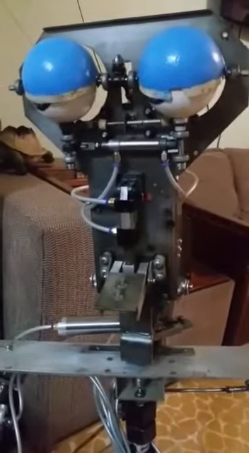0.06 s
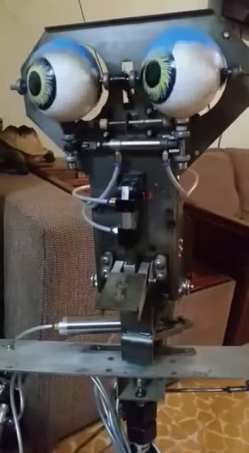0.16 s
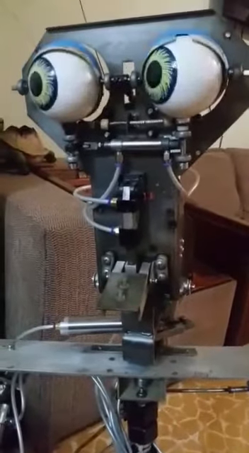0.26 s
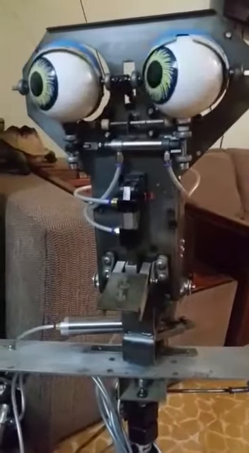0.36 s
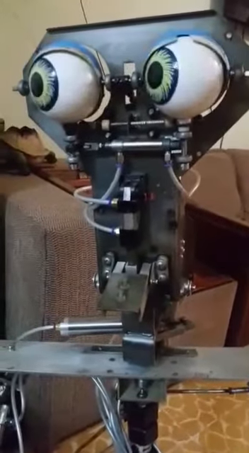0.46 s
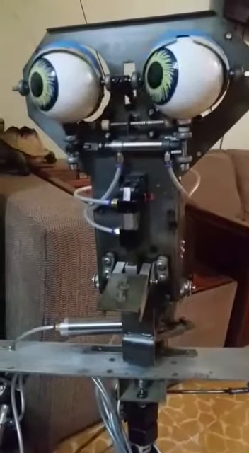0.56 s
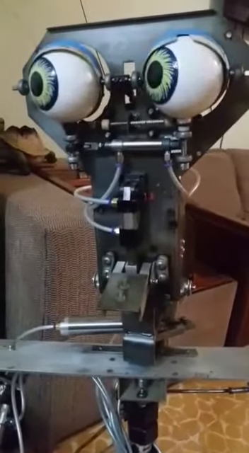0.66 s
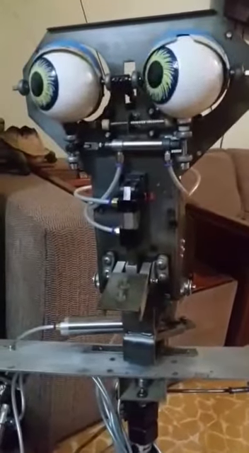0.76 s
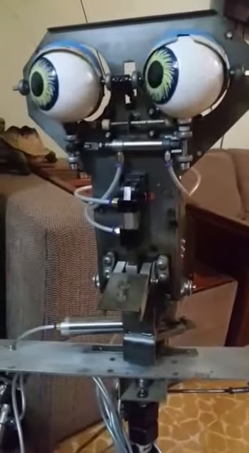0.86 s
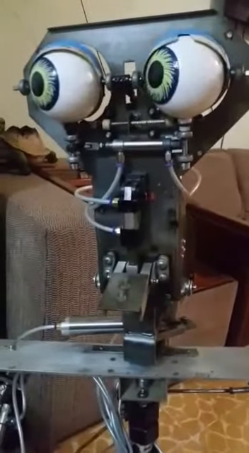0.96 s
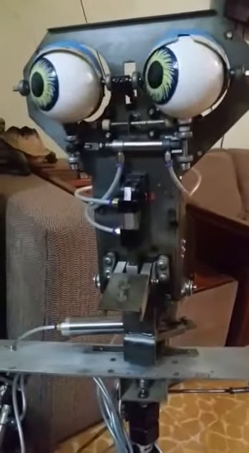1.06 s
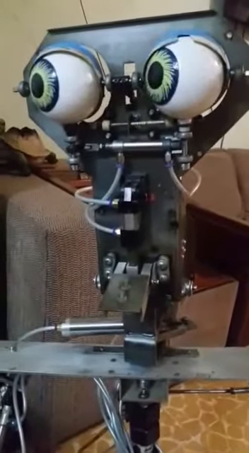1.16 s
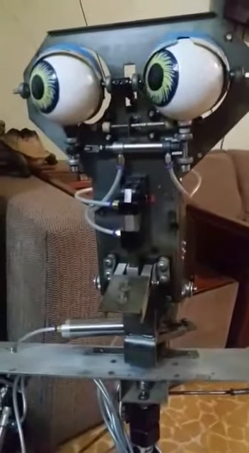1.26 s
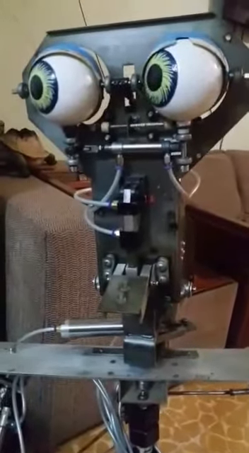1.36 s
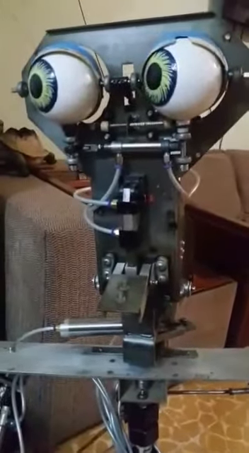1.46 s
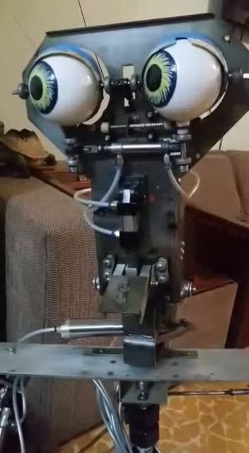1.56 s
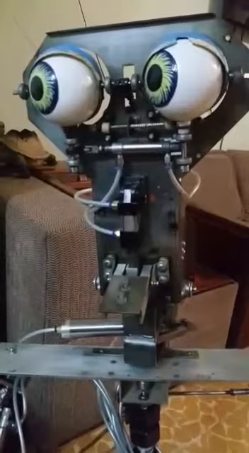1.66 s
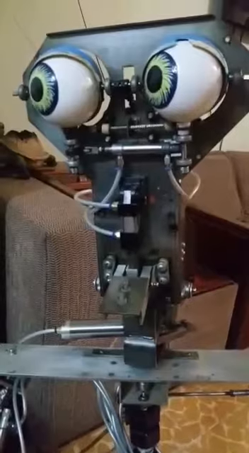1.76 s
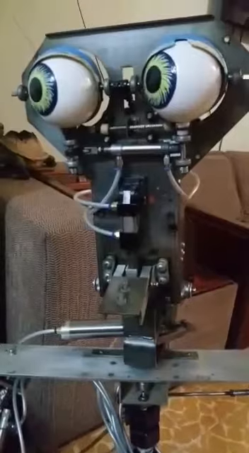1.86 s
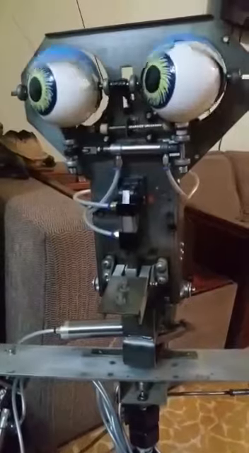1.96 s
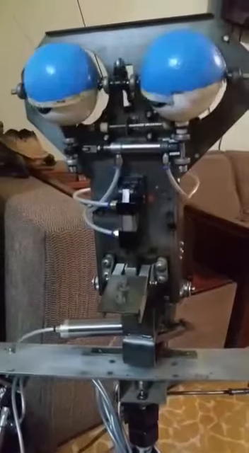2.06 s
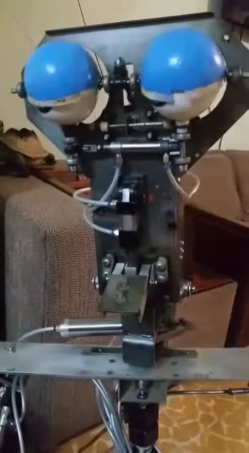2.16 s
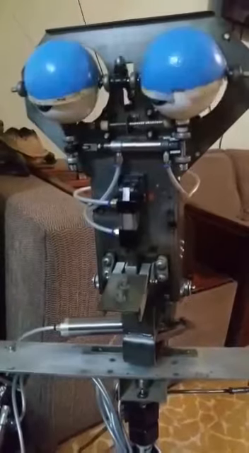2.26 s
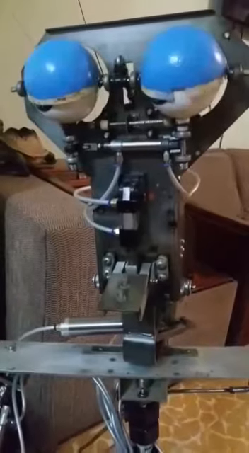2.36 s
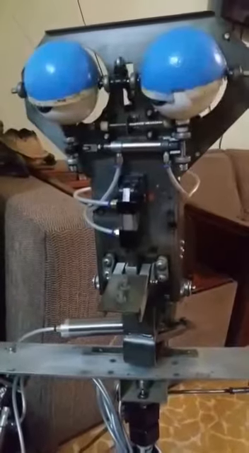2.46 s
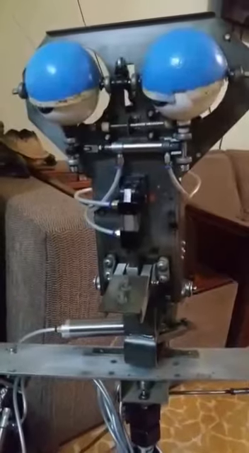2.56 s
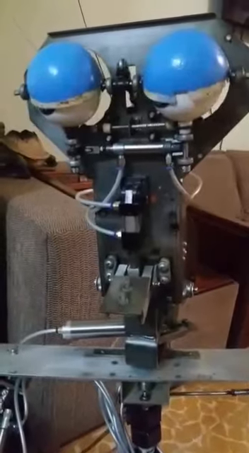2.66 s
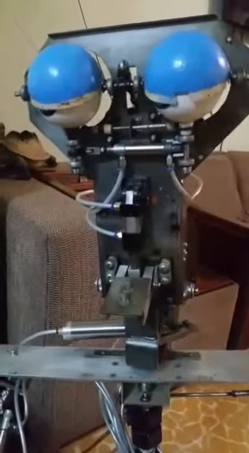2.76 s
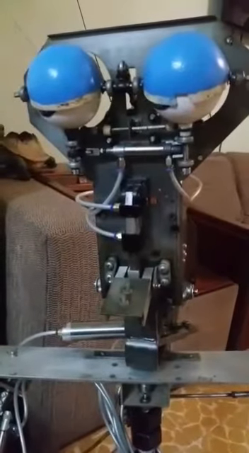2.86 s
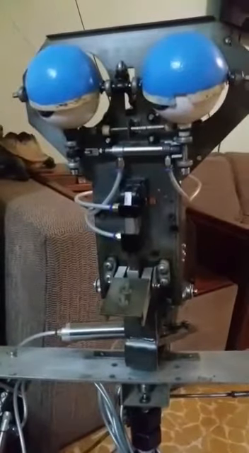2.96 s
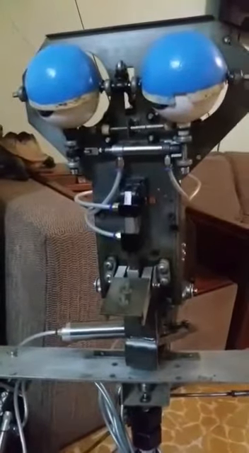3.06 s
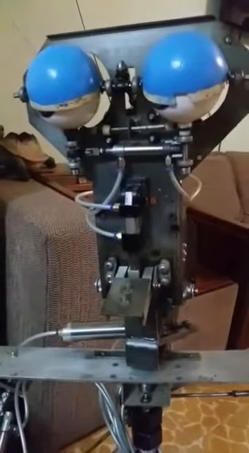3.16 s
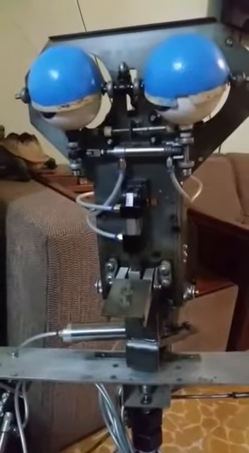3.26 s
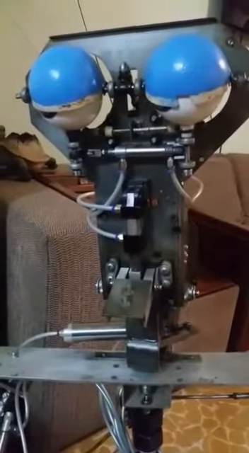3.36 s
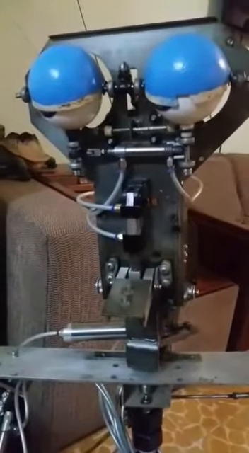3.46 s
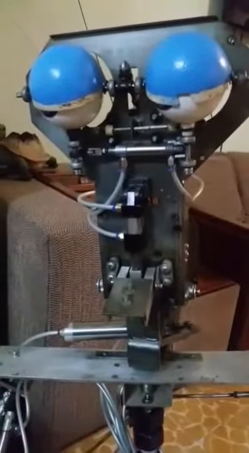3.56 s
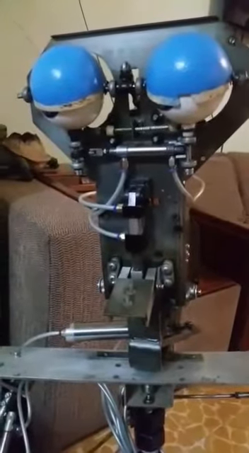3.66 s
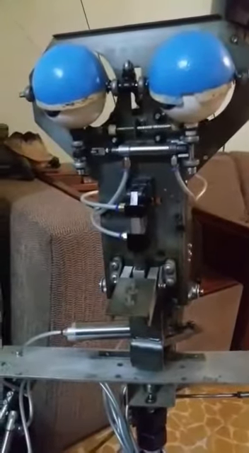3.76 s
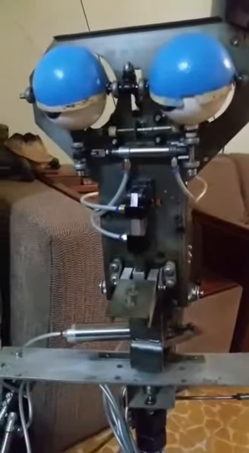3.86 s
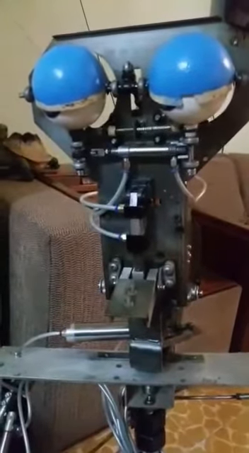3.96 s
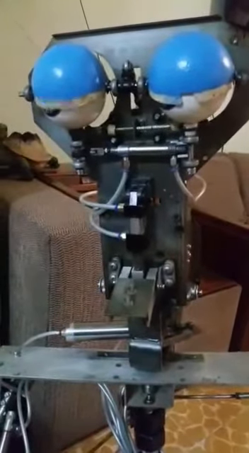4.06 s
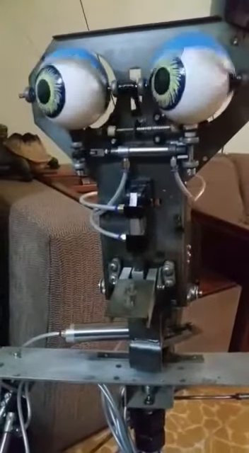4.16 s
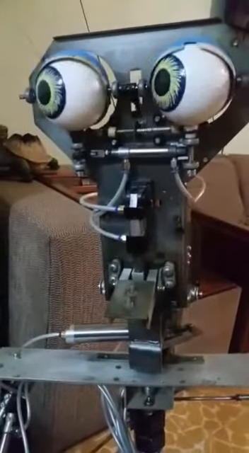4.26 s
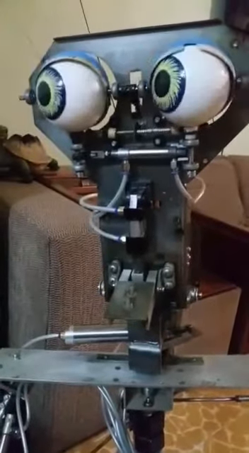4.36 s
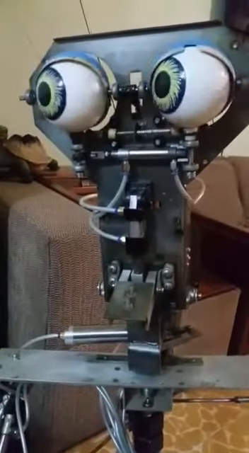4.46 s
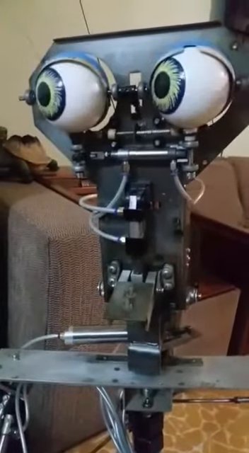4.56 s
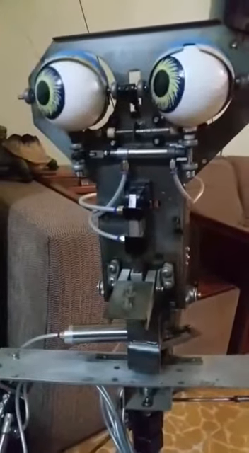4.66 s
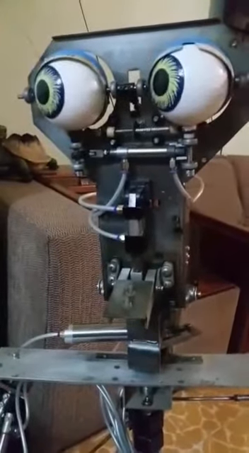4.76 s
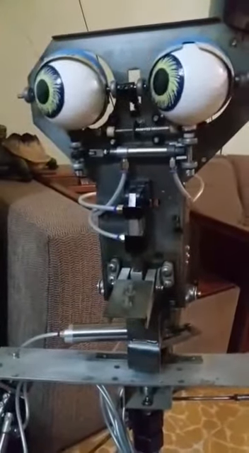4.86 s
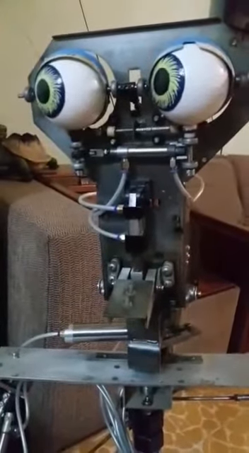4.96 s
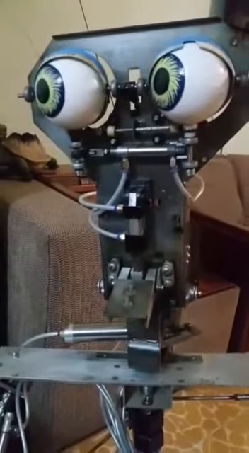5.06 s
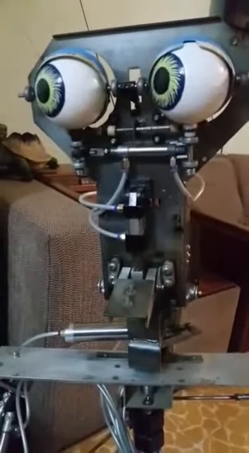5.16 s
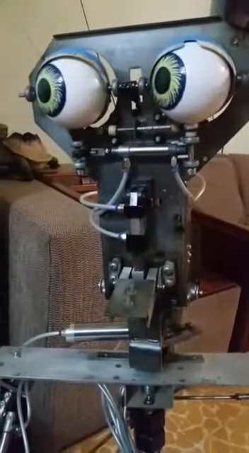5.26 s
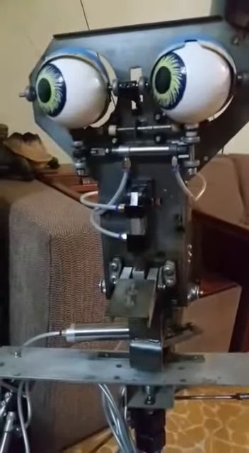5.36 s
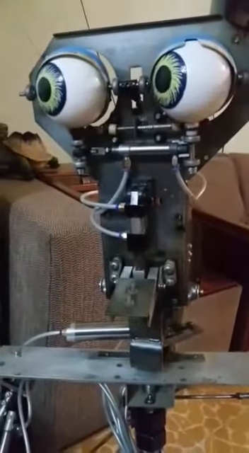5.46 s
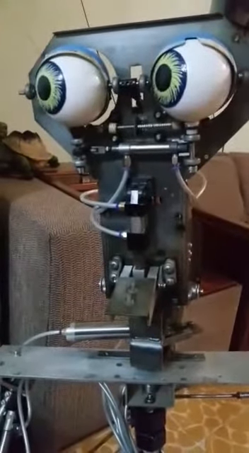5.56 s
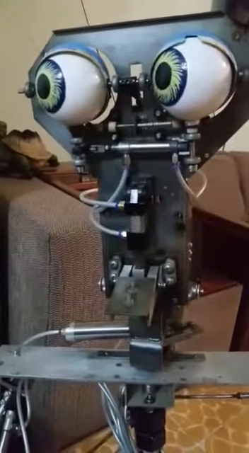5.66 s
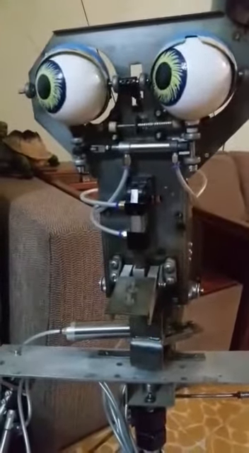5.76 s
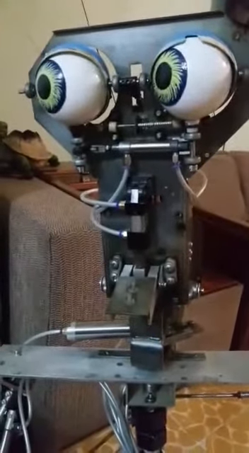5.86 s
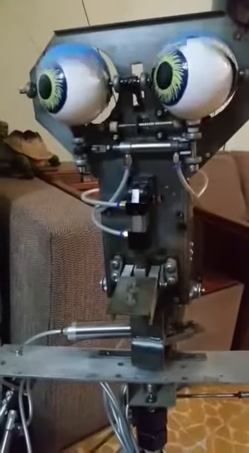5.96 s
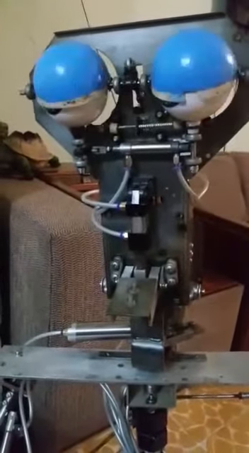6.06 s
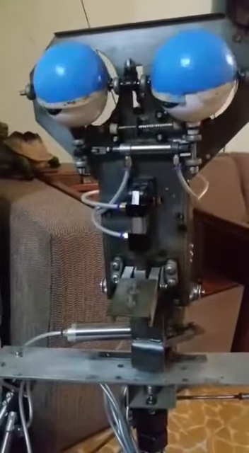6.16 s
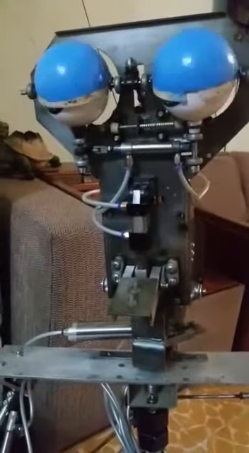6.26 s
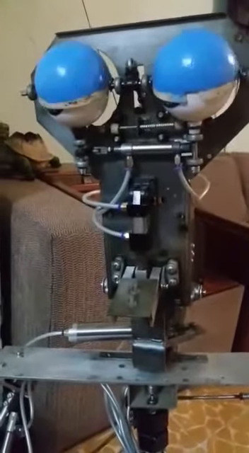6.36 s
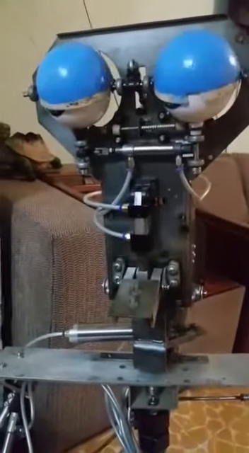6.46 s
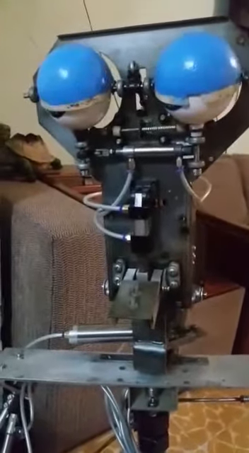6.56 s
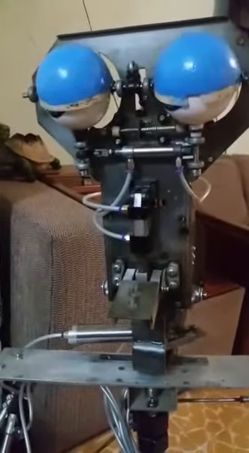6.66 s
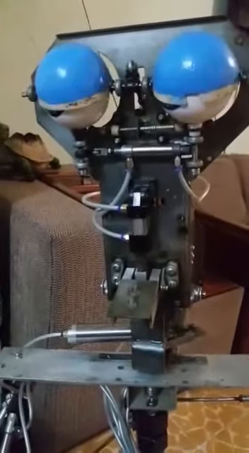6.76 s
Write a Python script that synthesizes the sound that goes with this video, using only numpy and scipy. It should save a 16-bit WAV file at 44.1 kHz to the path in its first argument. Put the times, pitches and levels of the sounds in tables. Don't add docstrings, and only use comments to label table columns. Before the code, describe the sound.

Close to a phone in a living room, a pneumatic robot head blinks. A hiss of air is already running when the eyelids clack open with a bright bouncing rattle. Later a valve ticks, air puffs, and they shut with a duller chattering clack. The open and shut pair repeats, the last shutting softer. Small dull knocks and a faint, wavering low machinery hum lie behind.

```python
import sys
import numpy as np
from scipy import signal
from scipy.fft import rfft, irfft
from scipy.io import wavfile
from scipy.ndimage import uniform_filter1d, minimum_filter1d

SR = 44100
rng = np.random.default_rng(int(sys.argv[2]) if len(sys.argv) > 2 else 0)


def store_wav(level_fs):
    pcm = np.round(np.clip(np.atleast_2d(level_fs), -1, 1) * 32767)
    wavfile.write(sys.argv[1], SR, pcm.T.astype(np.int16))


def nominal_scale(level):
    x = np.asarray(level, float) / 20
    return 10 ** x


N = 299880
TIME = np.arange(N) / SR
FREQ = np.arange(N // 2 + 1) * SR / N

# [t/s, peak level/dB]
OPEN_BLOWS = [
    (0.289, -18.5),
    (4.289, -18.5),
]
SHUT_BLOWS = [
    (2.115, -23),
    (6.114, -26),
]
# [delay t/s, level/dB, decay t/s]
OPEN_BOUNCES = [
    (0, 1, 0.0017),
    (.0055, -16.5, 0.0017),
    (.013, -10, .002),
    (0.0247, -14, .003),
    (.048, -19, .004),
]
SHUT_BOUNCES = [
    (0, 4, .001),
    (.0017, 1.5, .001),
    (.0035, 3.5, .001),
    (.0053, 0, .001),
    (.0072, -5, .0015),
    (0.0097, -1, 0.00098),
    (.023, -17.5, 0.0021),
]
# [f/Hz, level/dB per Hz]
OPEN_CRACK = [(150, -36), (250, -13.5), (841, -6), (1440, -23.5), (1860, -6), (2800, -8), (3250, -23.5),
              (3890, -2.5), (5010, -2.5), (6900, -22.5), (8030, -15), (8880, -20), (12700, -6),
              (14000, -38.5)]
SHUT_CRACK = [(30, -60), (65, -35), (100, -4.5), (281, 1.5), (656, -18), (952, -10), (2000, -0.5),
              (2320, -11), (5300, -4), (6650, -12), (7600, -28.5), (10900, -9), (13200, -29.5),
              (14000, -54)]
# [f/Hz, level/dB, t60 t/s]
OPEN_POP = [(723, -3, 0.019), (4100, -15, 0.0065), (1923, -17.5, .02), (3060, -24, .02)]
SHUT_POP = [(924, -13, 0.054), (189, -12, 0.048), (1050, -22.5, 0.038)]
# [f/Hz, level/dB, t60 t/s]
OPEN_MODES = [(614, -8, 0.37), (708, 4.5, 0.42), (787, -16, 0.71), (1940, 5, 0.12), (1900, -8.5, 0.26),
              (2660, -3.5, 0.47), (2900, -9.5, 0.4), (3580, -2, 0.22), (3650, -1.5, 0.27), (3900, 3, 0.25),
              (4020, -7, 0.37), (4740, -13.5, 0.45), (4880, -19, 1.1)]
SHUT_MODES = [(150, -1, 0.35), (412, -21, .8), (357, -6.5, .15), (583, -7, 0.21), (703, -6, 0.14),
              (908.6, -3.5, 0.3), (920, -5.5, 0.48), (1103, -10, 0.33), (1833, -20.5, 0.22),
              (2670, -9.5, 0.19), (2799, -30.5, 0.99), (3040, -5.5, 0.16), (3130, -24, 0.62),
              (3930, -6.5, 0.21), (4590, -17.5, 0.46)]
# [f/Hz, level/dB per Hz]
OPEN_TAIL = [(180, -48.5), (300, -18), (518, -16.5), (726, 1.5), (1100, -22), (1300, -24.5), (2850, -7.5),
             (3290, -20), (3570, -10.5), (3870, -12), (4540, -11.5), (7240, -25), (10100, -10.5),
             (12900, -15), (14000, -53.5)]
SHUT_TAIL = [(35, -57.5), (75, -31), (120, -11.5), (236, -1.5), (465, -8.5), (524, -8), (933, -2),
             (1500, -17.5), (2680, -11.5), (3540, -14), (4070, -13.5), (5490, -15.5), (8020, -26),
             (11000, -14), (12900, -20), (14000, -62.5)]
# [f/Hz, t60 t/s]
ROOM_T60 = [(150, 0.42), (700, 0.48), (2000, 0.61), (5000, 0.49), (9000, 0.37), (13000, 0.33)]

# [t/s, peak level/dB]
TICKS = [
    (1.9108, -32.5),
    (3.9095, -38),
    (5.9133, -31),
]
# [f/Hz, level/dB per Hz]
TICK_COLOUR = [(350, -52), (600, -17.5), (2880, -16), (4060, -7.5), (7240, -17), (8710, -14), (9550, -1.5),
               (12400, -3.5), (13100, -13), (14000, -40.5)]
# [f/Hz, level/dB per Hz]
STRIKE = [(200, -14), (600, -5), (6000, 4), (9000, -6)]
STRIKE_DB = 7
# [t/s, peak level/dB]
JOLTS = [
    (1.9195, -38),
    (3.9097, -38),
    (3.9222, -34),
    (5.9211, -29.5),
]
# [f/Hz, level/dB, t60 t/s]
JOLT_MODES = [(118, 4, 0.17), (150, 6, 0.06)]
# [f/Hz, level/dB per Hz]
JET = [(2940, -54.5), (5000, -19.5), (7000, -20), (7830, -12), (8600, -10.5), (9800, -4.5), (10600, -1),
       (11600, -2.5), (12600, 0), (13400, -6), (13500, -28), (14000, -73)]
# [f/Hz, width f/Hz, level/dB]
THUMP = [(120, 8, -5), (146.2, 11, -1), (169, 36, -11.5), (210, 12, -6), (252, 8, -10), (338, 12, -16)]
# [f/Hz, level/dB per Hz]
HOSE = [(180, -30), (300, -0.5), (347, -6), (508, -14.5), (619, -3.5), (982, -16.5), (2000, -11),
        (2600, -15.5), (3250, -20), (3800, -11), (4700, -16.5), (5500, -21.5), (7000, -23.5), (9100, -53.5),
        (15400, -120)]
# [t/s, jet level/dB, thump level/dB, hose level/dB]
OPEN_PUFFS = [
    (-0.091, -38.5, -37.5, -50.5),
    (3.909, -39, -38, -51),
]
SHUT_PUFFS = [
    (1.919, -38.5, -42, -56.5),
    (5.921, -39, -42.5, -59),
]
# [rise t/s, t60 t/s, lingering level/dB re peak]
OPEN_FLOW = [
    (0.0041, 0.44, -32),
    (0.004, 0.49, -29),
    (0.0039, .45, -21.5),
]
SHUT_FLOW = [
    (0.0044, 0.4, -39),
    (0.00099, 0.37, -21),
    (0.018, .9, -26.5),
]
VENT_SHUTS_S = .010

# [t/s, peak level/dB, f/Hz, t60 t/s]
KNOCKS = [
    (0.571, -53, 158, 0.14),
    (2.043, -41.5, 630, 0.074),
    (3.572, -59, 175, 0.41),
    (3.672, -56, 167, 0.18),
    (4.803, -43, 190, 0.035),
    (4.803, -55, 330, 0.017),
    (4.798, -49, 42.3, 0.13),
    (5.94, -51, 40, 0.32),
    (6.049, -46, 610, 0.067),
]

HUM_HZ = 82.9
HUMS = [(0, .1, -50), (.43, .95, -48), (1.68, .36, -51), (2.15, .85, -52.5), (2.94, .18, -46),
        (3.1, .27, -48.5), (3.6, .24, -54), (3.92, .13, -48), (4.1, .24, -43), (4.4, .3, -62),
        (5.45, .24, -51), (5.93, .12, -48)]
GROWL_HZ = 73.8
GROWLS = [(.98, 0.27, -48), (1.36, 0.061, -52), (1.85, 0.16, -53.5), (3.15, 0.19, -54.5), (3.9, 0.54, -55),
          (4.55, 0.12, -65), (4.98, 0.33, -61.5), (5.43, 0.27, -50), (5.78, 0.12, -58),
          (5.93, 0.059, -52.5)]
# [start t/s, length t/s, f/Hz, level/dB]
BOOMS = [(0, 0.3, 110.5, -61.5), (0.142, 0.24, 91.2, -56.5), (0.422, 0.24, 100.8, -53),
         (1.267, 0.18, 124, -65.5), (1.454, 0.18, 102, -56.5), (1.702, 0.38, 105, -53.5),
         (3.08, 0.65, 115.6, -63), (4.13, 0.17, 99, -54), (4.194, 0.346, 116.8, -57.5),
         (4.628, 0.223, 115.4, -56), (4.9, 0.29, 101.7, -61), (4.928, 0.27, 116.2, -63.5),
         (5.75, 0.12, 90.2, -59), (6.357, 0.33, 129.7, -63.5)]
BOOM_RISE_S, BOOM_FALL_S = 0.022, 0.021
# [f/Hz, width f/Hz, level/dB]
MURMUR = [(73.7, 5.8, -2), (86, 7, -2.5), (99, 7, -3), (117.3, 14, -4)]

# [f/Hz, level/dB per Hz]
HISS = [(210, -27), (350, -5), (469, -6), (539, -12), (831, -17), (1880, -15), (3180, -25), (3660, -12),
        (4200, -9), (4830, -12.5), (5460, -30), (6180, -34.5), (8680, -44), (12600, -27), (14000, -53)]
RUMBLE = [(12, -47.5), (20, -14.5), (48, -3), (70, -7.5), (91, -11), (140, -8), (165, -12), (198, -11),
          (462, -32), (512, -32.5), (700, -36), (910, -65), (1540, -120)]
LEAK = [(4410, -54), (7500, -19.5), (10100, -3.5), (12400, 2), (13300, -5), (13600, -19), (14000, -27.5)]
# [middle t/s, half-width t/s, level/dB]
SURGES = [(.6, 0.14, -85.5), (1.3, 0.2, -91), (1.6, 0.18, -83), (1.9, 0.058, -83), (3.27, 0.15, -90.5),
          (3.78, 0.11, -87), (4.6, 0.22, -87), (5.14, 0.15, -84), (5.8, 0.24, -90)]
# [t/s, level/dB]
FILTER = [(0, 6.5), (.44, 5), (.8, 0.5), (1.06, -0.5), (1.5, 2.5), (1.9, 5), (2.2, 5.5), (2.45, -6),
          (2.8, -13), (3.28, 5), (3.55, -1), (3.9, 2.5), (4.3, 10), (4.8, 1), (5.17, -2.5), (5.9, 2),
          (6.2, -4), (6.6, -11)]
BRIGHT_DB, DULL_DB, RUMBLE_DB, LEAK_DB, MURMUR_DB = -77.5, -78.5, -67.5, -99.5, -62.5
DULL_FOLLOWS, RUMBLE_FOLLOWS, LEAK_FOLLOWS, MURMUR_FOLLOWS = 0.93, 0.58, .9, 0.71

# [f/Hz, level/dB]
HEAD_PORT_DB = [(60, -3), (200, -1), (500, 0.5), (1200, 1.5), (2300, -1), (3500, -3.5), (5000, -7),
                (7000, -3.5), (10000, 3.5), (13000, -5.5)]
ROOM_PORT_DB = [(25, -4.5), (60, -2), (200, -3), (500, 1), (1200, 0.5), (2300, 5.5), (4100, 9.5),
                (6000, 1.5), (13000, 0.5)]
# [f/Hz, phase/rad]
PORT_RAD = [(0, -0.5), (860, 1.17), (1300, 2.69), (1720, 2.5), (1980, 2), (3010, 4.5), (3450, 3.5),
            (5170, 8.5), (6890, 9.5), (8180, 10.5), (10500, 6), (11200, 10.5), (12300, 13.5), (13000, 10),
            (13900, 12.5)]
TOP_HZ = 13150


def lids(events, bounces, crack, pop, modes, tail, ring_db, tail_db, stretch):
    out = nominal_scale(tail_db) * reverb(events, tail, stretch)
    snap = unit(air(nominal_scale(on_hz(crack)), 0.48))
    for s, db in events:
        clatter = 0
        for lag, level, tau in bounces:
            contact = fade(s + lag, 7 * tau, 0.00043) * snap
            clatter = clatter + nominal_scale(level) * (contact + ring(s + lag, pop, 0))
        ringing = nominal_scale(ring_db + 3.5 * walk(60)) * ring(s, modes, 1.4)
        out = out + nominal_scale(db) * (clatter + ringing)
    return out


def reverb(events, spectrum, stretch):
    noise = rfft(unit(air(nominal_scale(on_hz(spectrum)), 0.085)))
    centre = np.log(np.array(ROOM_T60)[:, 0])
    out = 0
    for row, (hz, t60) in zip(np.eye(len(centre)), ROOM_T60):
        share = np.interp(np.log(FREQ + 1), centre, row)
        decay = sum(nominal_scale(db) * fade(s, stretch * t60, 0.009) for s, db in events)
        out = out + irfft(noise * share, N) * nominal_scale(1.7 * walk(200)) * decay
    return out


def valve():
    tick = sum(nominal_scale(db) * (fade(s, .008, .0003) + 1.3 * fade(s + .0018, .006, .0002)) for s, db in TICKS)
    click = tick * unit(air(nominal_scale(on_hz(TICK_COLOUR)), 0.45))
    contact = sum(nominal_scale(db) * fade(s + .001, .0009, .00003) for s, db in TICKS)
    strike = colour(contact, nominal_scale(on_hz(STRIKE)))
    jolt = sum(nominal_scale(db) * ring(s, JOLT_MODES, 0, rise_s=.006) for s, db in JOLTS)
    return click - nominal_scale(STRIKE_DB) * strike + jolt + puffs()


def puffs():
    resonance = sum(nominal_scale(db) / (1 + 2j * (FREQ - hz) / width) for hz, width, db in THUMP)
    jet = unit(air(nominal_scale(on_hz(JET)), .4), 8000, 13500) * nominal_scale(1.6 * walk(300))
    thump = unit(air(resonance, .9), 100, 320)
    hose = unit(air(nominal_scale(on_hz(HOSE)), 0.33), 500, 5500)
    out = 0
    for events, rules in (OPEN_PUFFS, OPEN_FLOW), (SHUT_PUFFS, SHUT_FLOW):
        for s, *levels in events:
            for db, rule, layer in zip(levels, rules, (jet, thump, hose)):
                out = out + nominal_scale(db) * flow(s, *rule) * layer
    return out


def flow(start_s, rise_s, t60_s, linger_db):
    stop_s = min(s for s, db in OPEN_BLOWS + SHUT_BLOWS if s > start_s) - VENT_SHUTS_S
    t = np.maximum(TIME - start_s, 0)
    shape = (1 - np.exp(-t / rise_s)) ** 2 * (1000. ** (-t / t60_s) + nominal_scale(linger_db))
    return uniform_filter1d(shape * (TIME < stop_s), size=130, mode="nearest")


def knocks():
    out = 0
    for s, db, hz, t60 in KNOCKS:
        thud = unit(air(1 / (1 + 2j * (FREQ - hz) / (0.83 * hz)), 1.0))
        tap = ring(s, [(hz, -4, 0.61 * t60)], 0, rise_s=0.00049)
        out = out + nominal_scale(db) * (fade(s, t60, 0.0069) * thud + tap)
    return out


def boom():
    hum = swells(HUMS, HUM_HZ, second_db=-40.5, third_db=-45.5)
    growl = swells(GROWLS, GROWL_HZ, second_db=-19.5, third_db=-17.5)
    others = sum(swells([(s, length, db)], hz, second_db=-48.5, third_db=-50) for s, length, hz, db in BOOMS)
    modes = sum(nominal_scale(db) / (1 + (2 * (FREQ - hz) / width) ** 2) for hz, width, db in MURMUR)
    murmur = unit(air(modes, .8)) * nominal_scale(MURMUR_DB + MURMUR_FOLLOWS * filter_gain_db())
    return hum + growl + others + murmur


def swells(rows, hz, second_db, third_db):
    phase = 2 * np.pi * np.cumsum(hz * (1 + .022 * walk(12))) / SR
    tone = np.sin(phase) + nominal_scale(second_db) * np.sin(2 * phase) + nominal_scale(third_db) * np.sin(2.95 * phase)
    levels = []
    for s, length, db in rows:
        before = np.maximum((s - TIME) / BOOM_RISE_S, 0)
        after = np.maximum((TIME - s - length) / BOOM_FALL_S, 0)
        levels.append(db - 10 * before - 10 * after)
    return np.sqrt(2) * nominal_scale(np.max(levels, axis=0) + 1.1 * walk(30)) * tone


def background():
    gain_db = filter_gain_db()
    upper = 1 / (1 + (3000 / (FREQ + 1)) ** 8)
    bright = unit(air(nominal_scale(on_hz(HISS)) * upper, 0.14), 3000, 5200)
    bright = bright * nominal_scale(BRIGHT_DB + gain_db + 1.3 * walk(10))
    dull = unit(air(nominal_scale(on_hz(HISS)) * (1 - upper), 0.35), 650, 2500)
    dull = dull * nominal_scale(DULL_DB + DULL_FOLLOWS * gain_db + 0.92 * walk(5.9))
    tilt_db = np.array([[-4.0], [4.0]]) / (1 + (FREQ / 45) ** 4)
    alike = .9 * FREQ ** 2 / (FREQ ** 2 + 60 ** 2)
    rumble = unit(air(nominal_scale(on_hz(RUMBLE) + tilt_db), alike), 150, 510)
    rumble = rumble * nominal_scale(RUMBLE_DB + RUMBLE_FOLLOWS * gain_db + 1.6 * walk(13))
    surge = sum(nominal_scale(db) * np.exp(-((TIME - s) / width) ** 2) for s, width, db in SURGES)
    leak = unit(air(nominal_scale(on_hz(LEAK)), 0.11), 9000, 13000) * (surge + nominal_scale(LEAK_DB + LEAK_FOLLOWS * gain_db))
    self_noise = nominal_scale(-90.5) * unit(air(1. * (FREQ > 500), 0))
    return bright + dull + leak + self_noise + rumble


def filter_gain_db():
    return np.interp(TIME, *np.transpose(FILTER))


def on_hz(table):
    hz, value = np.transpose(table)
    return np.interp(np.log(FREQ + 1), np.log(hz + 1), value)


def unit(x, lo_hz=0, hi_hz=SR):
    power = np.abs(rfft(x)) ** 2
    band = power[..., (FREQ >= lo_hz) & (FREQ < hi_hz)]
    return x * N / np.sqrt(2 * band.sum() / (x.size // N))


def colour(x, gain):
    return irfft(rfft(x) * gain, N)


def air(gain, alike):
    common, own = rng.standard_normal(N), rng.standard_normal((2, N))
    alike = np.clip(alike, 0, 1)
    return irfft(gain * (np.sqrt(alike) * rfft(common) + np.sqrt(1 - alike) * rfft(own)), N)


def walk(rate):
    k = int(SR / rate)
    steps = np.repeat(rng.standard_normal(N // k + 1), k)
    return np.sqrt(2) * uniform_filter1d(uniform_filter1d(steps, k), k)[:N]


def fade(start_s, t60_s, rise_s):
    out, first = np.zeros(N), int(start_s * SR) + 1
    t = TIME[first:first + int(2 * t60_s * SR)] - start_s
    out[first:first + len(t)] = (1 - np.exp(-t / rise_s)) * nominal_scale(-60 * t / t60_s)
    return out


def ring(start_s, modes, scatter, rise_s=0.00042):
    chance, first = rng.standard_normal((len(modes), 4)), int(start_s * SR)
    t = TIME[first:first + SR] - start_s
    out = np.zeros((2, N))
    for (hz, db, t60), (detune, shift, *port) in zip(modes, chance):
        phase = scatter * (shift + 0.46 * np.array(port)[:, None])
        swing = np.sin(2 * np.pi * hz * (1 + 0.002 * detune) * t + phase)
        out[:, first:first + SR] += nominal_scale(db) * fade(start_s, t60, rise_s)[first:first + SR] * swing
    return out


def ports(x, balance):
    port = nominal_scale(on_hz(balance) / 2) * np.exp(.5j * on_hz(PORT_RAD))
    top = nominal_scale(-43.0) + 1 / (1 + (FREQ / TOP_HZ) ** 80)
    impulse = irfft(np.array([port, 1 / port]) * top, N)
    response = np.roll(impulse, 256, axis=1)[:, :513] * np.hanning(513)
    return signal.oaconvolve(np.pad(x, ((0, 0), (256, 256)), "reflect"), response, "valid", axes=1)


def scene():
    opening = lids(OPEN_BLOWS, OPEN_BOUNCES, OPEN_CRACK, OPEN_POP, OPEN_MODES, OPEN_TAIL,
                   ring_db=-30.0, tail_db=-16.5, stretch=1.14)
    closing = lids(SHUT_BLOWS, SHUT_BOUNCES, SHUT_CRACK, SHUT_POP, SHUT_MODES, SHUT_TAIL,
                   ring_db=-18.0, tail_db=-14.5, stretch=0.83)
    head = opening + closing + valve() + knocks()
    return ports(head, HEAD_PORT_DB) + ports(boom() + background(), ROOM_PORT_DB)


def starve(x, busy_db, under_db, idle_db, near_db, spread_db, hole_db):
    z = signal.stft(x, nperseg=1024, noverlap=512)[2][:, :512]
    power = (np.abs(z) ** 2).reshape(2, 64, 8, -1).sum(axis=2).mean(axis=0)
    band = 10 * np.log10(power + 1e-18)
    band[:3] = band.min()
    margin = np.where(band[26:].max(axis=0) > busy_db, under_db, idle_db)
    neighbours = -minimum_filter1d(-band, size=7, axis=0)
    luck = uniform_filter1d(rng.standard_normal(band.shape), size=6) * np.sqrt(6)
    masked_below = np.maximum(band.max(axis=0) - margin, neighbours - near_db)
    dropped = band < masked_below + spread_db * luck
    dropped[:4] = False
    dropped[:, np.diff(band[4:].mean(axis=0), prepend=0) > 6] = False
    gain = np.repeat(np.where(dropped, nominal_scale(hole_db), 1.), 8, axis=0)
    return signal.istft(np.pad(z * gain, ((0, 0), (0, 1), (0, 0))), nperseg=1024, noverlap=512)[1][:, :N]


def duck(x):
    events = OPEN_BLOWS + SHUT_BLOWS + TICKS[::2]
    dip = sum(.65 * np.exp(-((TIME - s + .008) / .004) ** 4) for s, db in events)
    return x - dip * colour(x, 1 / (1 + (600 / (FREQ + 1)) ** 4))


def top_cut(x):
    return signal.sosfilt(signal.butter(12, 14330, fs=SR, output="sos"), x)


def record(dry):
    thinned = starve(dry, busy_db=-82, under_db=19.5, idle_db=27, near_db=17, spread_db=6, hole_db=-30)
    mix = duck(thinned)
    return top_cut(mix)


dry = scene()
out = record(dry)
store_wav(out)
```